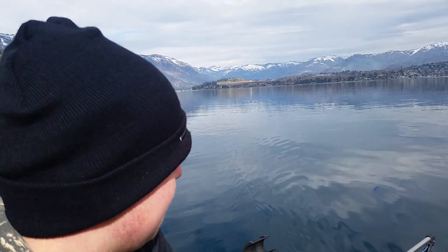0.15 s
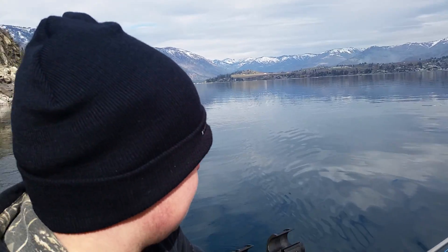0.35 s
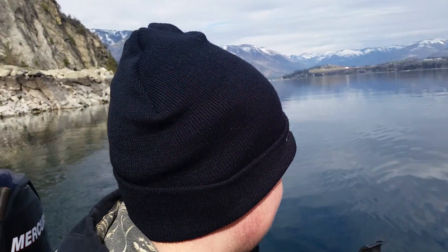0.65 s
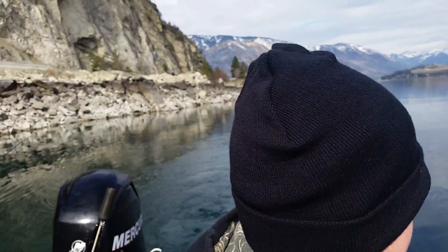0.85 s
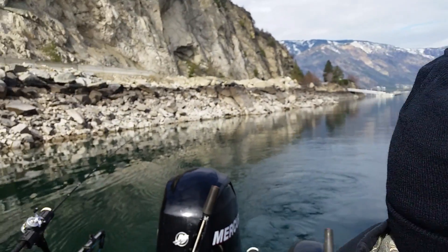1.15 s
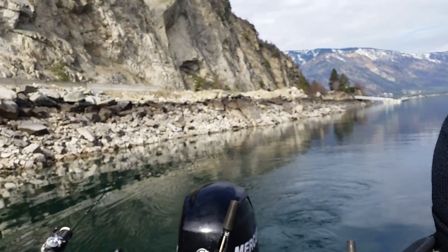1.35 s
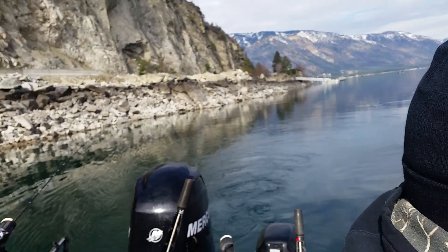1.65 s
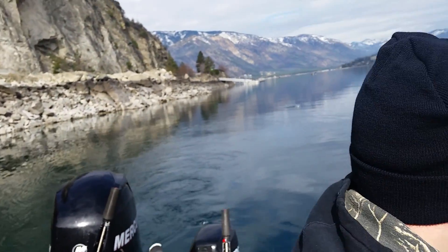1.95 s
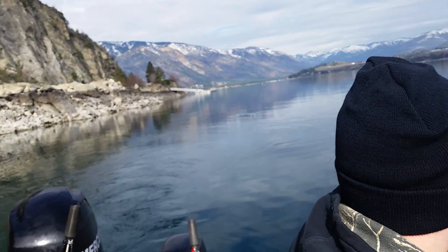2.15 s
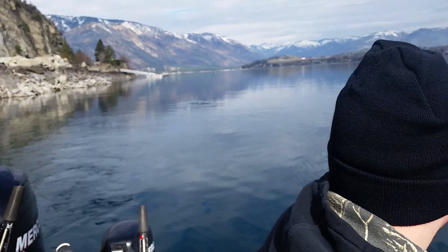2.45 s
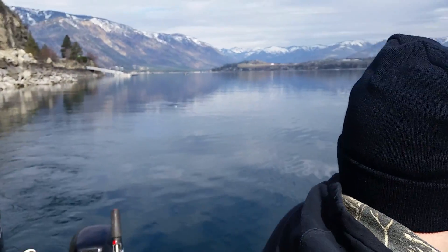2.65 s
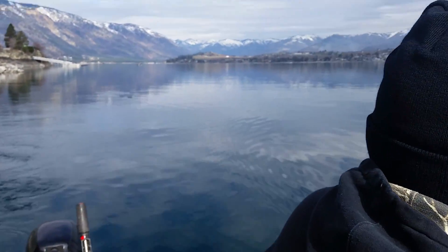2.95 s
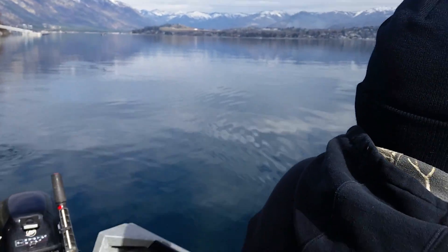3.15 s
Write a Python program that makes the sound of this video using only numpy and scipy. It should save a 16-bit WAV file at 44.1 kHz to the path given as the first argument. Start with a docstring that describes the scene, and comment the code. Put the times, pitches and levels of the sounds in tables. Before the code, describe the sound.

Outboard engine chugging slowly on calm water, with hollow gurgle, light rattle and water spray.

```python
"""Uneven thumping of a small two-cylinder outboard idling on calm water, over a hum and a gurgle.
Each firing rings the exhaust leg (pulses into resonances) and rattles the cowling (gated noise, valve ticks).
The hull hums on engine orders (sines), the gas gurgles under water (noise pulsing once a turn).
Cooling water hisses, sprays and spatters, mostly left (shaped noise, decaying bursts).
Two knocks sound on the hull. Left and right are two microphone ports, nearly alike in the bass."""
import sys
import numpy as np
from scipy import signal
from scipy.fft import rfft, irfft
from scipy.io import wavfile

SR = 44100
rng = np.random.default_rng(int(sys.argv[2]) if len(sys.argv) > 2 else 0)


def dump(signal):
    """Clip the signal to [-1, 1] and save it as 16-bit WAV at the path in sys.argv[1]."""
    limited = np.clip(np.atleast_2d(signal).T, -1, 1)
    pcm = np.round(limited * 32767).astype(np.int16)
    wavfile.write(sys.argv[1], SR, pcm)


def ratio_of_db(decibels):
    """Turn decibels (scalar or array-like) into linear amplitude factors; 0 dB maps to 1."""
    return 10 ** (np.asarray(decibels, float) / 20)


N = 145530  # samples

# All dB levels are relative; trims and filters follow.
# crank speed, one firing a turn: (time [s], speed [Hz])
CRANK_SPEED = [(0.0, 24.3), (0.15, 24.6), (0.9, 25.35), (1.2, 24.88), (1.65, 24.01), (2.0, 23.29),
               (2.3, 22.93), (2.85, 23.13), (3.1, 22.57), (3.3, 22.2)]
START_TURNS = 0.76
# wandering engine levels; of the last column and the high mode only the movement about the mean counts:
# (time [s], exhaust [dB], gurgle [dB], rattle [dB], high cowling mode [dB], third order [dB], other orders [dB])
ENGINE_LEVELS = [(0, -31.5, -41.5, -59, -66, -40, -26.5), (.24, -28, -41, -52.5, -68.5, -30, -40.5),
                 (.47, -32.5, -41, -52.5, -67, -36.5, -40), (.94, -29.5, -42, -54, -74.5, -46.5, -36.5),
                 (1.18, -33, -40.5, -52, -78, -34, -33), (1.41, -27.5, -43.5, -56, -73, -36.5, -34),
                 (1.65, -34, -41.5, -56.5, -67, -34.5, -34.5), (1.89, -27, -41.5, -52, -59, -35, -32),
                 (2.12, -29.5, -40.5, -50.5, -63, -41, -39), (2.36, -30, -42, -53, -68, -46, -36),
                 (2.59, -23, -40.5, -46, -71, -47.5, -38.5), (2.83, -25.5, -39.5, -44.5, -68.5, -47, -40.5),
                 (3.3, -29.5, -41, -47, -63.5, -47, -39.5)]

# highest hiss swelling: (middle [s], length [s], level [dB], centre [Hz])
HISS_SWELLS = [(0.848, 0.26, -61, 12400), (2.735, 0.52, -60.5, 12250)]
SWELL_WIDTH_HZ, SWELL_LEFT_DB, SWELL_RIGHT_DB = 1900, 6, -8.5

# water hiss spectrum: (frequency [Hz], left [dB per Hz], right [dB per Hz])
HISS_SPECTRUM = [(690, -37.5, -28), (1560, -9, 9.5), (2420, -2, -18), (3100, -2, -13), (4090, -3.5, -13),
                 (4480, 4, -19), (5160, -4, -29), (6260, -10, -30), (7230, -20, -36.5),
                 (8500, -40.5, -40.5), (9600, -43.5, -57.5)]
# hiss level: (time [s], level [dB])
HISS_LEVEL = [(0.0, -55.5), (0.91, -55), (3.15, -53.5), (3.3, -54)]
# hiss puffing with each firing: (time [s], depth [0-1])
HISS_PUFF = [(1.4, 0.12), (1.8, 0.12), (2.4, 0.08), (3.0, 0.16)]
HISS_WAVER_DB, HISS_WAVER_HZ = 0.64, 15

# spray spectrum: (frequency [Hz], left [dB per Hz], right [dB per Hz])
SPRAY_SPECTRUM = [(7000, -41.5, -25.5), (8400, -17.5, -52), (9700, -23.5, -12), (10100, -10.5, -15),
                  (12400, 13, 0.5), (14000, 10, 1.5), (15400, 12, 1.5), (16200, -23.5, -46)]
# spray level: (time [s], level [dB])
SPRAY_CURVE = [(0, -73), (.7, -72), (1.0, -68), (1.45, -65.5), (1.7, -67), (2.1, -64), (2.4, -63),
               (2.9, -57.5), (3.3, -59.5)]
SPRAY_DB, SPRAY_WAVER_DB, SPRAY_WAVER_HZ = 4.0, 0.91, 24
DROPS_PER_S, DROPS_DB, DROP_SPREAD_DB, DROP_T60_S = 250, -7, 3.5, 0.006
# loud drops: (time [s], level [dB])
LOUD_DROPS = [(0.2539, -46), (0.3459, -47), (0.394, -44), (0.672, -43.5), (1.006, -43), (1.0639, -45),
              (1.21, -25), (1.43, -41.5), (1.7444, -39.5), (2.0535, -41), (2.102, -37), (2.2993, -38),
              (2.9555, -41), (3.037, -32.5), (3.1488, -28), (3.2168, -43)]
SPATTER_DB, SPATTER_CLICK_DB, SPATTER_T60_S = -4.5, -0.5, 0.0081
# duller drops: (time [s], level [dB])
DULL_DROPS = [(1.9928, -72), (2.4738, -66), (2.626, -60.5), (2.768, -57)]
DULL_HZ, DULL_WIDTH_HZ, DULL_T60_S = 7150, 800, 0.0086
DULL_DB, DULL_RIGHT_DB = 23.5, -13

# hull hum: (engine order [per turn], level [dB])
HUM_ORDERS = [(1, -34.5), (2, -18.5), (3, -0.5), (4, -12.5), (5, -7.5), (6, -5.5)]
HUM_DB, HUM_WAVER_DB, HUM_WAVER_HZ, HUM_FOLLOWS = -35.5, 0.5, 1.5, 0.39
# hull knocks: (time [s], level [dB])
HULL_KNOCKS = [(1.585, -24), (2.836, -14)]
KNOCK_HZ, KNOCK_WIDTH_HZ, KNOCK_DB = 78, 45, -4.0

# gurgle spectrum: (frequency [Hz], level [dB per Hz])
GURGLE_SPECTRUM = [(25, -27.5), (45, -6), (160, -6), (200, 4.5), (250, -1.5), (330, -10), (450, -15),
                   (620, -25.5), (900, -25), (1400, -28), (2000, -77.5)]
# share of the gurgle that differs between ports: (frequency [Hz], gain [dB])
GURGLE_UNLIKE = [(60, -13.5), (200, -21), (400, -12.5), (800, -4.5)]
GURGLE_DB, GURGLE_DEPTH = 9.5, 0.15

# cowling modes: (centre [Hz], width [Hz], left [dB], right [dB])
COWL_MODES = [(776, 170, -1, -0.5), (1047, 79, 1.5, 2.5), (1290, 142, -2.5, 5.5), (1519, 180, 2, -1.5),
              (1840, 210, -4, -6.5), (3450, 690, -10, -30.5)]
# high mode with its own level: (centre [Hz], width [Hz], left [dB], right [dB])
HIGH_MODE = (2663.5, 108, -5, -15)
# rattle dulling with time: (time [s], slope [dB per octave])
RATTLE_SLOPE = [(.6, 8), (1.2, 0), (2.6, -5)]
RATTLE_DB, RATTLE_T60_S, RATTLE_FLOOR, RATTLE_SPREAD_DB = -0.47, 0.15, 0.46, 2
RATTLE_ALIKE, RATTLE_LAG_S = 0.83, 0.00015
HIGH_TICK_DB, HIGH_T60_S, HIGH_BROAD_DB = 7, 0.025, -17.5
# two valve ticks a firing: (time [s], early tick [dB], late tick [dB])
VALVE_LEVELS = [(.7, 20, 20.5), (1.0, 28, 10), (1.9, 25.5, 22), (2.3, 15.5, 15.5), (3.3, 17, 17.5)]
EARLY_DELAY_S, LATE_DELAY_S, VALVE_WEAK_DB, VALVE_SPREAD_DB = 0.007, 0.013, -7, 2.0
VALVE_HZ, VALVE_WIDTH_HZ, VALVE_PEAK_DB, VALVE_CLICK_DB = 1384, 240, 13, -6.5
# harder clacks: (time [s])
CLACK_TIMES = [2.797, 2.971, 3.058, 3.235]
CLACK_DB = 28.5

# exhaust leg resonances, each applied twice: (centre [Hz], width [Hz], level [dB])
LEG_MODES = [(191.1, 40.6, 6.5), (225.4, 10.7, -1), (144.4, 43, -9.5), (335, 45, -17.5), (415, 66, -20.5)]
# softer swelling of the thump: (time [s], share [0-1])
THUMP_SOFTNESS = [(1.9, .1), (2.45, .9)]
SOFT_HZ, SOFT_WIDTH_HZ = 212, 85
THUMP_DB, EXHAUST_DELAY_S, JITTER_S, FIRING_SPREAD_DB = -0.77, 0.002957, 0.0003, 1.3
WEAK_CYLINDER_DB, WEAK_LAG_S = -2.0, 0.0016
UPPER_LEG_HZ, UPPER_WEAK_DB = 280, 8  # the weak cylinder rings the upper leg modes harder
BASS_RIGHT_DB, BASS_LAG_S = 0.4, 0.00018


def rms_one(x):
    """Scale to rms 1."""
    return x / np.sqrt(np.mean(x ** 2) + 1e-20)


def in_time(rows):
    """Interpolate the columns of a time table to every sample."""
    time_s, *columns = np.transpose(rows)
    return [np.interp(np.arange(N) / SR, time_s, column) for column in columns]


def noise_pair():
    """Independent white noise for two channels."""
    return rng.standard_normal((2, N))


def colour(x, points):
    """Filter by dB over log frequency, one table column per channel."""
    hz, *db = np.transpose(points)
    log_hz = np.log(np.maximum(np.arange(N // 2 + 1) * SR / N, 1))
    gain_db = [np.interp(log_hz, np.log(hz), column) for column in db]
    return irfft(rfft(x) * ratio_of_db(gain_db), N)


def drift(rate_hz):
    """Slow random wander of rms 1: two-pole smoothed noise, drawn every 40 samples."""
    r = np.exp(-80 * np.pi * rate_hz / SR)
    slow = signal.lfilter([1], [1, -2 * r, r * r], rng.standard_normal(N // 40 + 2002))
    slow = slow[2000:]  # skip the settling
    return np.interp(np.arange(N) / 40, np.arange(len(slow)), rms_one(slow - slow.mean()))


def resonance(x, hz, width_hz):
    """Two-pole band with peak gain 1."""
    r = np.exp(-np.pi * width_hz / SR)
    zeros = (1 - r * r) / 2 * np.array([1, 0, -1])
    poles = [1, -2 * r * np.cos(2 * np.pi * hz / SR), r * r]
    return signal.lfilter(zeros, poles, x + 1e-18)


def twice(x, hz, width_hz):
    """The same resonance applied twice: soft onset, steep skirts."""
    return resonance(resonance(x, hz, width_hz), hz, width_hz)


def clicks(time_s, db):
    """Single-sample clicks at given times and levels."""
    out = np.zeros(N)
    np.add.at(out, np.clip((np.asarray(time_s) * SR).astype(int), 0, N - 1), ratio_of_db(db))
    return out


def dying(x, t60_s):
    """Each click starts an exponential decay."""
    return signal.lfilter([1], [1, -ratio_of_db(-60 / (t60_s * SR))], x + 1e-18)


def late(x, delay_s):
    """Delay x by a constant or varying time."""
    return np.interp(np.arange(N) - delay_s * SR, np.arange(N), x)


def crank_turns():
    """Crank angle in turns: the integral of speed."""
    return START_TURNS + np.cumsum(in_time(CRANK_SPEED)[0]) / SR


def firings(turns):
    """Firing times [s] at whole turns, and 1 for the weak cylinder, every second firing."""
    count = np.arange(1, int(turns[-1]) + 1)
    return np.searchsorted(turns, count) / SR, count % 2


def hiss_swells():
    """Highest hiss swelling: band noise under half-cosine envelopes."""
    time_s, noise = np.arange(N) / SR, noise_pair()
    out = 0
    for middle_s, length_s, db, hz in HISS_SWELLS:
        envelope = np.cos(np.pi * np.clip((time_s - middle_s) / length_s, -.5, .5))
        out = out + ratio_of_db(db) * envelope * rms_one(twice(noise, hz, SWELL_WIDTH_HZ))
    return colour(out, [(9500, -13), (11500, 2)]) * ratio_of_db([[SWELL_LEFT_DB], [SWELL_RIGHT_DB]])


def hiss(turns):
    """Cooling water hiss: shaped noise, puffing once a firing."""
    level = ratio_of_db(in_time(HISS_LEVEL)[0] + HISS_WAVER_DB * drift(HISS_WAVER_HZ))
    puff = 1 + in_time(HISS_PUFF)[0] * np.cos(2 * np.pi * (turns - .2))
    return rms_one(colour(noise_pair(), HISS_SPECTRUM)) * level * puff


def spray_colour(x):
    """Spray spectrum, scaled so that unit white noise keeps rms 1 over both ports."""
    return colour(x, SPRAY_SPECTRUM) / np.std(colour(noise_pair(), SPRAY_SPECTRUM))


def spray():
    """Fine drops: noise raised by short decays at random times."""
    level = ratio_of_db(in_time(SPRAY_CURVE)[0] + SPRAY_DB + SPRAY_WAVER_DB * drift(SPRAY_WAVER_HZ))
    size = ratio_of_db(DROP_SPREAD_DB * np.minimum(rng.exponential(1, N), 5))
    born = (rng.random(N) < DROPS_PER_S / SR) * size
    drops = rms_one(dying(born, DROP_T60_S))
    return spray_colour(level * noise_pair() * (1 + ratio_of_db(DROPS_DB) * drops))


def spatter():
    """Loud drops: a click and a decaying burst of random signs."""
    time_s, db = np.transpose(LOUD_DROPS)
    burst = clicks(time_s, db + SPATTER_DB)
    tail = np.sign(noise_pair()) * dying(burst, SPATTER_T60_S)
    return spray_colour(ratio_of_db(SPATTER_CLICK_DB) * burst + tail)


def dull_drops():
    """Duller drops: decaying noise bursts through one band."""
    time_s, db = np.transpose(DULL_DROPS)
    burst = noise_pair() * dying(clicks(time_s, db), DULL_T60_S)
    return resonance(burst, DULL_HZ, DULL_WIDTH_HZ) * ratio_of_db([[DULL_DB], [DULL_DB + DULL_RIGHT_DB]])


def hull_hum(turns, third_db, orders_db):
    """Hull driven at low engine orders: sines locked to the crank."""
    others_db = HUM_DB + HUM_FOLLOWS * (orders_db - orders_db.mean())
    hum = np.zeros(N)
    for (order, db), start in zip(HUM_ORDERS, rng.random(len(HUM_ORDERS))):
        own_db = third_db if order == 3 else others_db + HUM_WAVER_DB * drift(HUM_WAVER_HZ)
        hum += np.sqrt(2) * ratio_of_db(db + own_db) * np.sin(2 * np.pi * (order * turns + start))
    return hum


def hull_knocks():
    """Knocks on the hull: clicks through a low resonance twice, scaled by the peak."""
    time_s, db = np.transpose(HULL_KNOCKS)
    knock = twice(clicks(time_s, db), KNOCK_HZ, KNOCK_WIDTH_HZ)
    return ratio_of_db(KNOCK_DB + np.max(db)) * knock / np.abs(knock).max()


def gurgle(turns, gurgle_db):
    """Gas under water: noise pulsing once a turn; returns the shared part and the opposed pair."""
    pulse = 1 + GURGLE_DEPTH * np.cos(2 * np.pi * (turns - .4))
    noise = rms_one(colour(noise_pair() * pulse, GURGLE_SPECTRUM))
    mid, side = ratio_of_db(gurgle_db + GURGLE_DB) * noise
    return mid, colour(side, GURGLE_UNLIKE) * [[1], [-1]]


def valve_ticks(fired_s, weak):
    """Early and late valve clicks a firing, plus clacks; returns all of them and the unscaled early ones."""
    early_db, late_db = in_time(VALVE_LEVELS)
    early_luck, late_luck = VALVE_SPREAD_DB * rng.standard_normal((2, len(fired_s)))
    early = clicks(fired_s + EARLY_DELAY_S, early_luck)
    after = clicks(fired_s + LATE_DELAY_S, VALVE_WEAK_DB * weak + late_luck)
    return ratio_of_db(early_db) * early + ratio_of_db(late_db) * after + clicks(CLACK_TIMES, CLACK_DB), early


def high_cowling(early):
    """High cowling mode: noise, louder after each early tick, through a narrow band."""
    hz, width_hz, left_db, right_db = HIGH_MODE
    struck = (RATTLE_FLOOR + ratio_of_db(HIGH_TICK_DB) * dying(early, HIGH_T60_S)) * noise_pair()
    broad = resonance(struck, hz, 12 * width_hz)
    ring = resonance(broad, hz, width_hz) + ratio_of_db(HIGH_BROAD_DB) * broad
    return ratio_of_db([[left_db], [right_db]]) / np.sqrt(width_hz) * ring


def cowling(fired_s, weak, rattle_db, high_db):
    """Cowling modes rung by noise that decays after each firing, and by valve ticks."""
    firing_clicks = clicks(fired_s, RATTLE_SPREAD_DB * rng.standard_normal(len(fired_s)))
    gate = RATTLE_FLOOR + dying(firing_clicks, RATTLE_T60_S)
    shared, *own = gate * rng.standard_normal((3, N))
    valve, early = valve_ticks(fired_s, weak)
    shared = np.sqrt(RATTLE_ALIKE) * shared + ratio_of_db(VALVE_CLICK_DB) * valve
    shared = shared + ratio_of_db(VALVE_PEAK_DB) * resonance(valve, VALVE_HZ, VALVE_WIDTH_HZ)
    shake = np.array([shared, late(shared, RATTLE_LAG_S)]) + np.sqrt(1 - RATTLE_ALIKE) * np.array(own)
    slope_db = in_time(RATTLE_SLOPE)[0]
    rings = 0
    for hz, width_hz, left_db, right_db in COWL_MODES:
        octaves = np.clip(np.log2(hz / VALVE_HZ), -.5, .5)
        gain = ratio_of_db([[left_db], [right_db]] + slope_db * octaves) / np.sqrt(width_hz)
        rings = rings + gain * resonance(resonance(shake, hz, 3 * width_hz), hz, width_hz)
    high_level = ratio_of_db(rattle_db.mean() + high_db - high_db.mean())
    scale = ratio_of_db(RATTLE_DB) / np.std(rings)
    return scale * (ratio_of_db(rattle_db) * rings + high_level * high_cowling(early))


def exhaust_thump(fired_s, weak, exhaust_db):
    """Firing pulses ring the exhaust leg; the weak cylinder comes softer and later."""
    time_luck, level_luck = rng.standard_normal((2, len(fired_s)))
    thump_s = fired_s + EXHAUST_DELAY_S + WEAK_LAG_S * weak + JITTER_S * time_luck
    thump_db = WEAK_CYLINDER_DB * weak + FIRING_SPREAD_DB * level_luck
    lower = clicks(thump_s, thump_db)
    upper = clicks(thump_s, thump_db + UPPER_WEAK_DB * (weak - .5))
    ring = np.zeros(N)
    for hz, width_hz, db in LEG_MODES:
        ring += ratio_of_db(db) * twice(upper if hz > UPPER_LEG_HZ else lower, hz, width_hz)
    soft = in_time(THUMP_SOFTNESS)[0]
    softened = rms_one(resonance(ring, SOFT_HZ, SOFT_WIDTH_HZ))
    thump = (1 - soft) * rms_one(ring) + soft * softened
    return ratio_of_db(exhaust_db + THUMP_DB) * rms_one(thump)


def water(turns):
    """Hiss, spray and single drops."""
    return hiss_swells() + hiss(turns) + spray() + spatter() + dull_drops()


def engine(turns):
    """Bass nearly alike in both ports, the left lagging more and more; cowling in stereo."""
    exhaust_db, gurgle_db, rattle_db, high_db, third_db, orders_db = in_time(ENGINE_LEVELS)
    fired_s, weak = firings(turns)
    gurgle_mid, gurgle_pair = gurgle(turns, gurgle_db)
    bass = hull_hum(turns, third_db, orders_db) + hull_knocks() + gurgle_mid
    bass = bass + exhaust_thump(fired_s, weak, exhaust_db)
    pair = np.array([late(bass, np.linspace(0, BASS_LAG_S, N)), ratio_of_db(BASS_RIGHT_DB) * bass])
    return pair + gurgle_pair + cowling(fired_s, weak, rattle_db, high_db)


def scene():
    """Water and engine on one crank."""
    turns = crank_turns()
    return water(turns) + engine(turns)


def roll_off(x):
    """The treble ends steeply here."""
    return signal.sosfilt(signal.butter(12, 16410, fs=SR, output="sos"), x)


def record(dry):
    """Cut the top steeply: 45 dB down from 16.1 kHz."""
    low_pass = signal.cheby2(24, 45, 16100, fs=SR, output="sos")
    mix = signal.sosfilt(low_pass, dry)
    return roll_off(mix)


dry = scene()
out = record(dry)
dump(out)
```